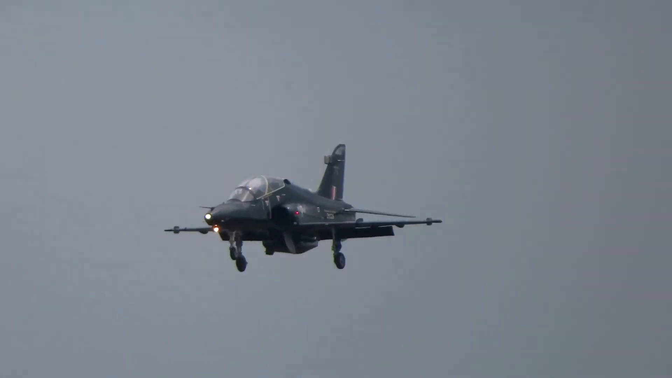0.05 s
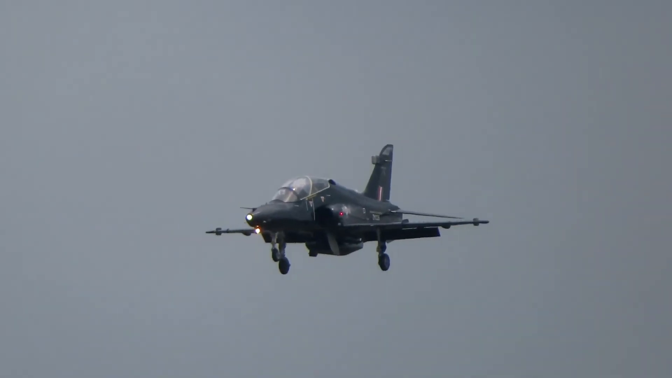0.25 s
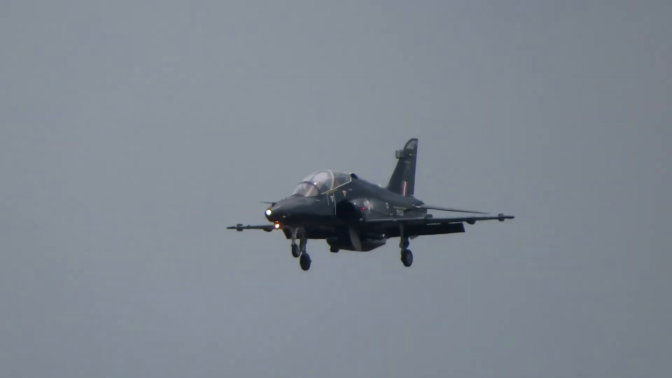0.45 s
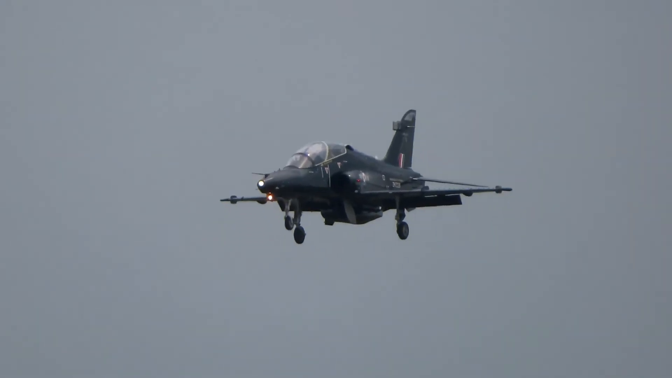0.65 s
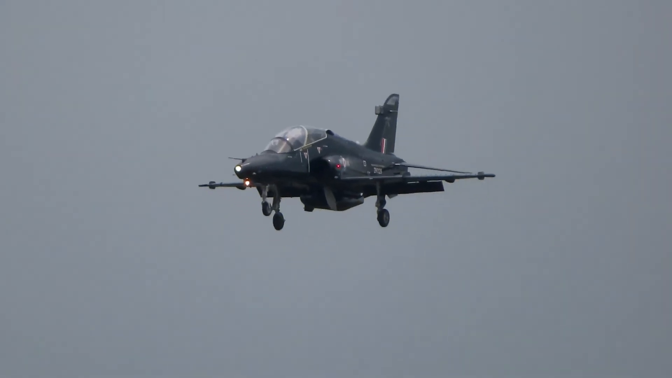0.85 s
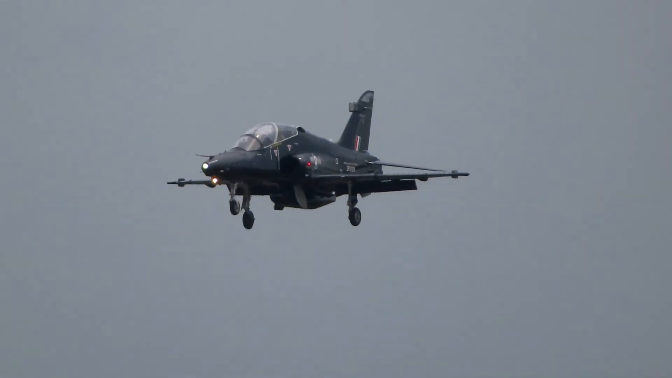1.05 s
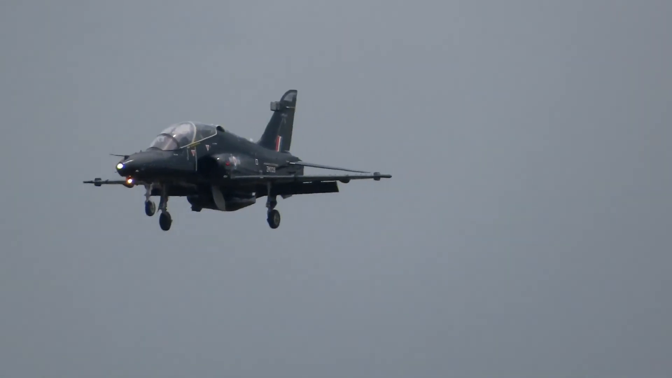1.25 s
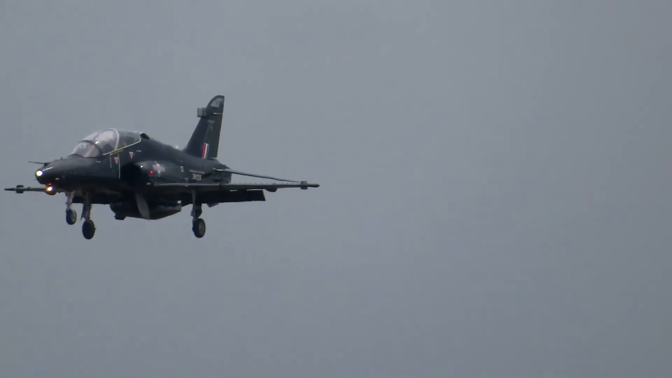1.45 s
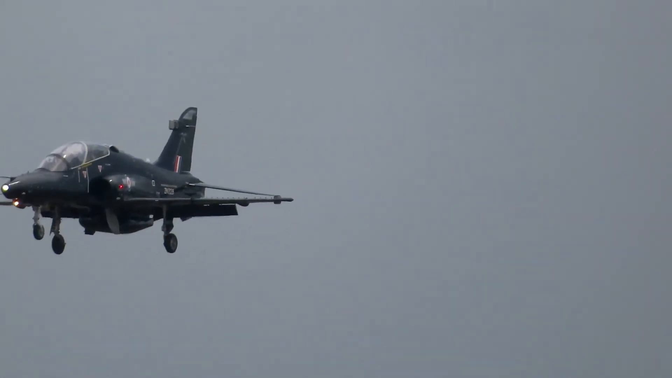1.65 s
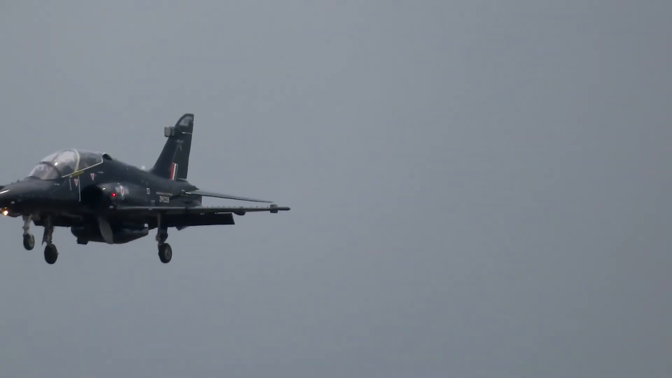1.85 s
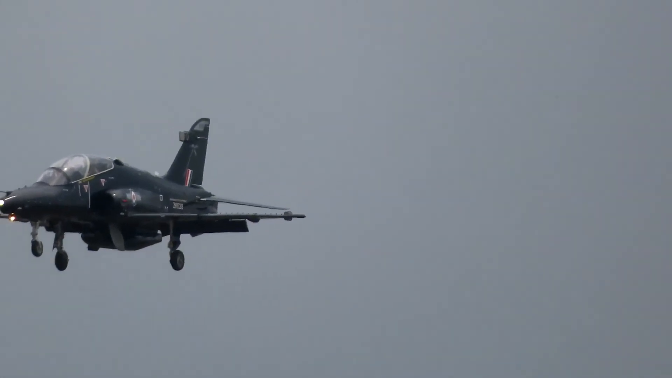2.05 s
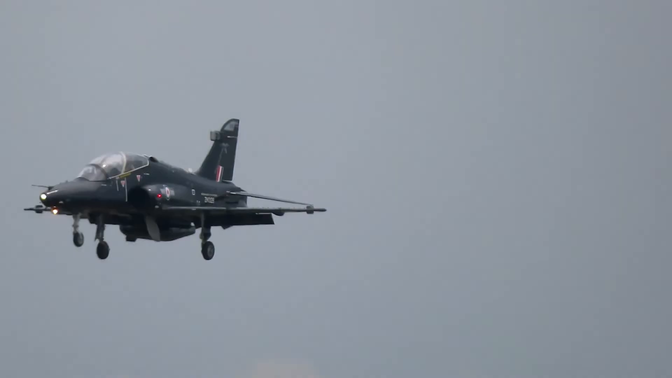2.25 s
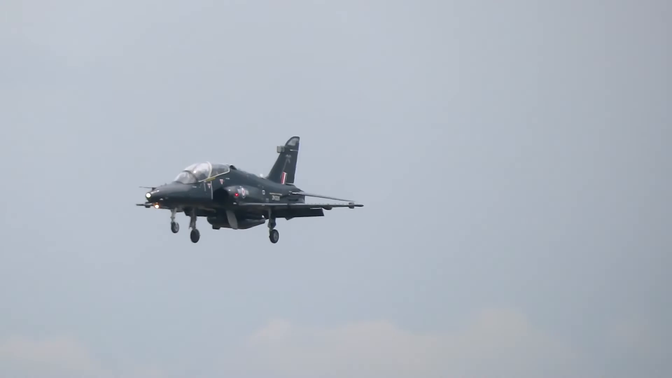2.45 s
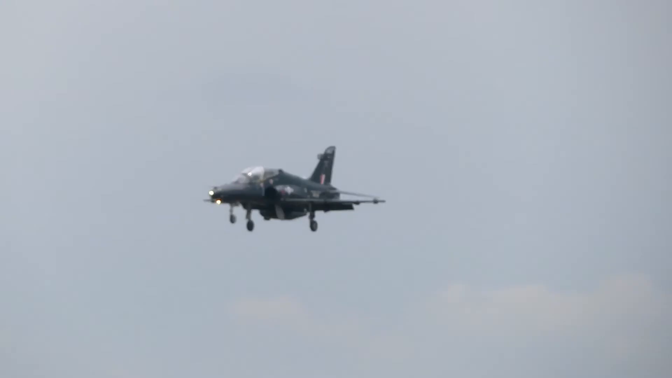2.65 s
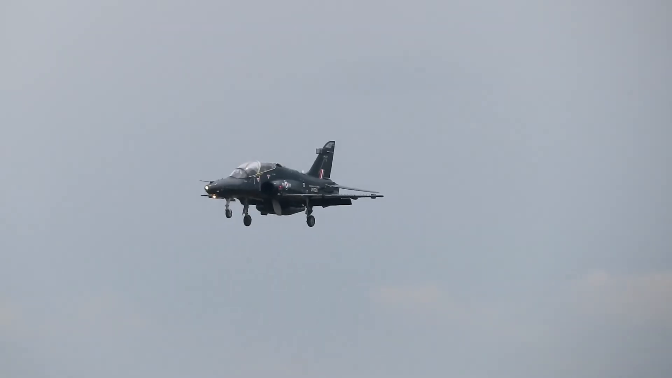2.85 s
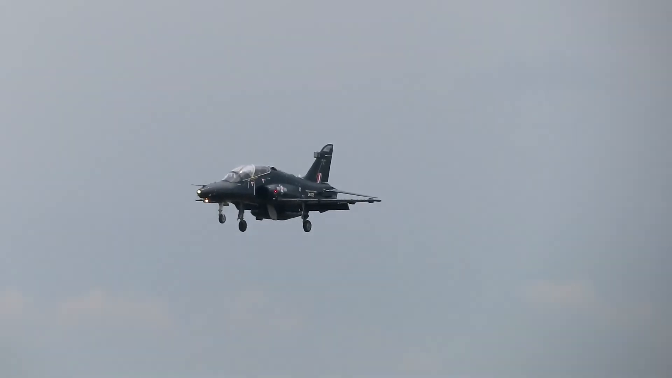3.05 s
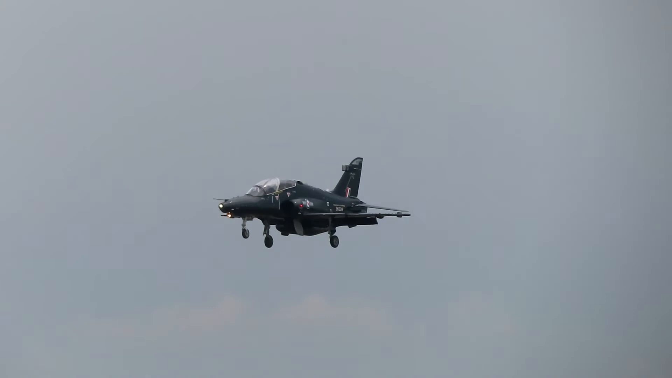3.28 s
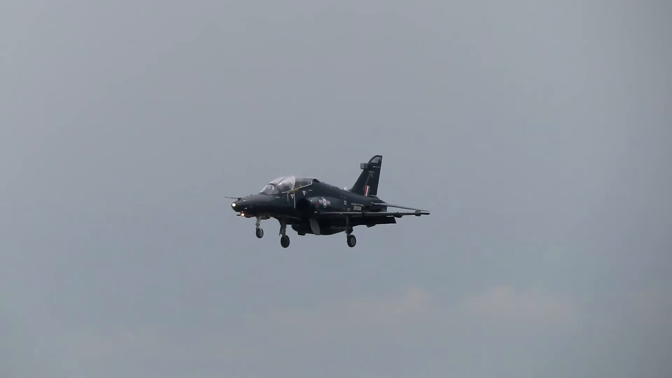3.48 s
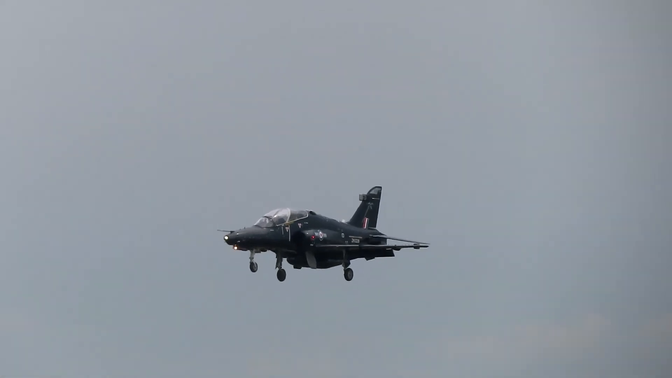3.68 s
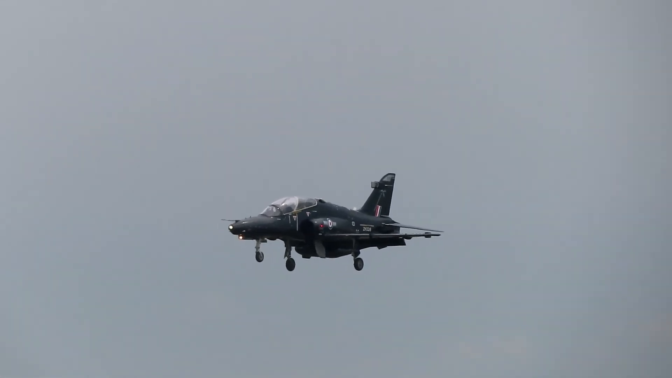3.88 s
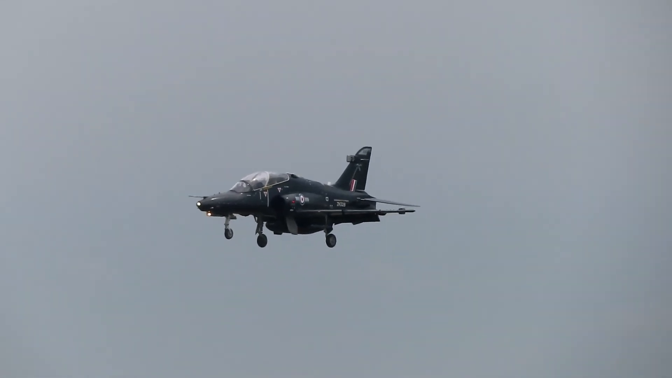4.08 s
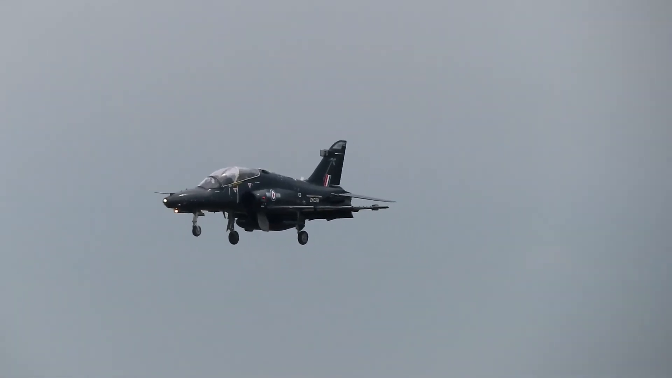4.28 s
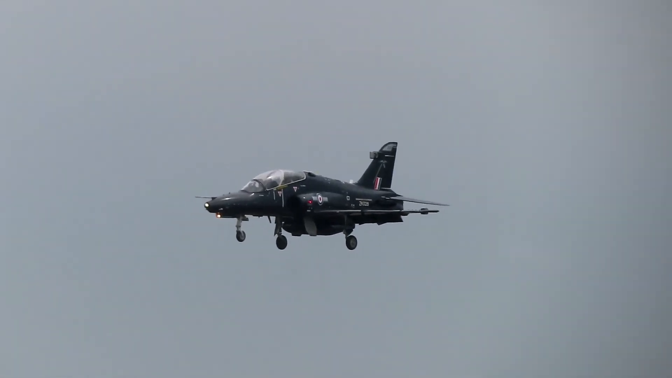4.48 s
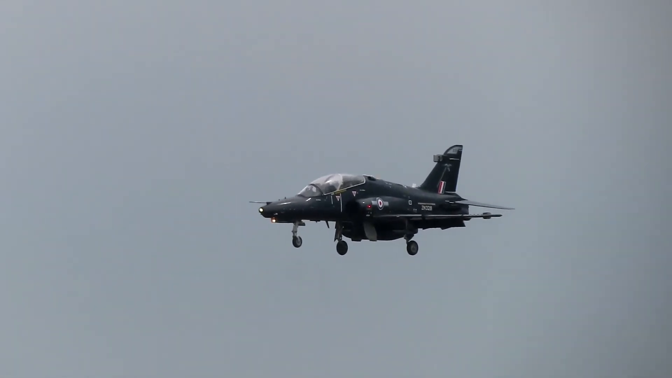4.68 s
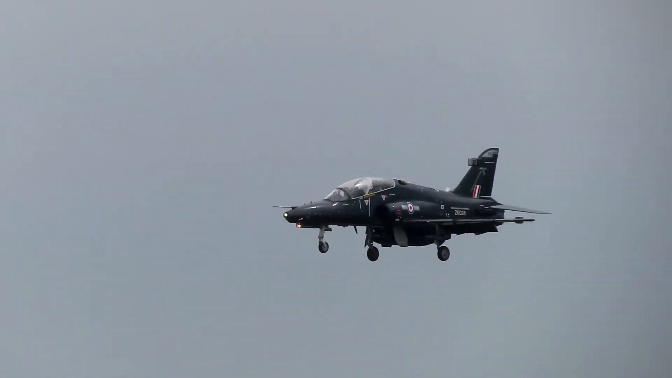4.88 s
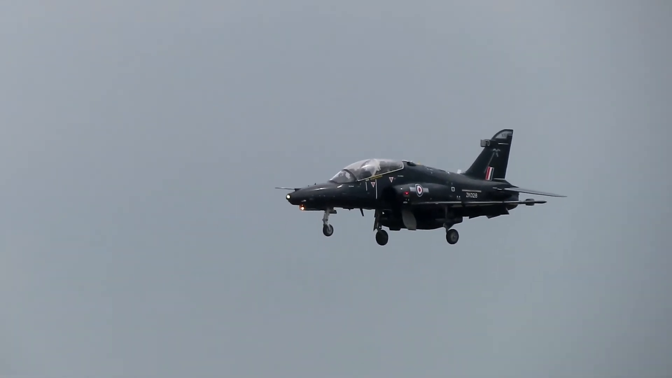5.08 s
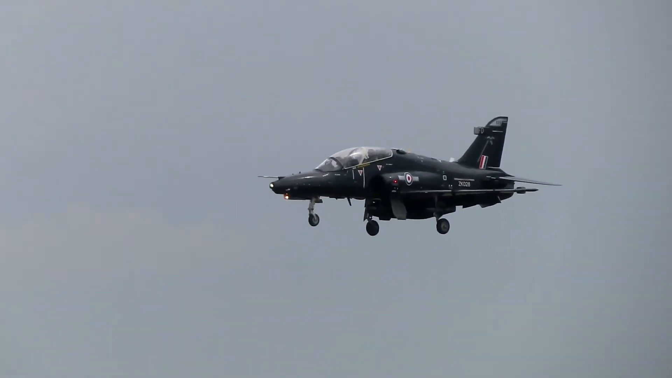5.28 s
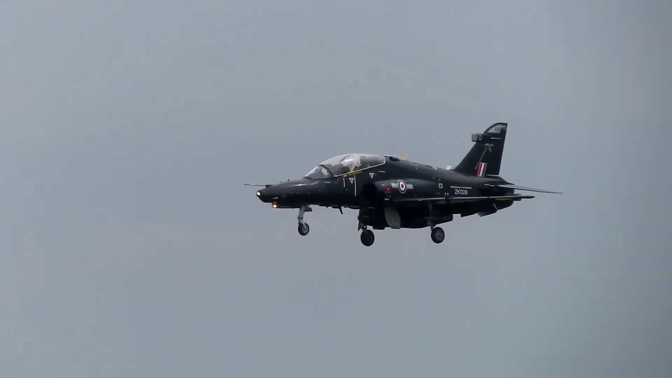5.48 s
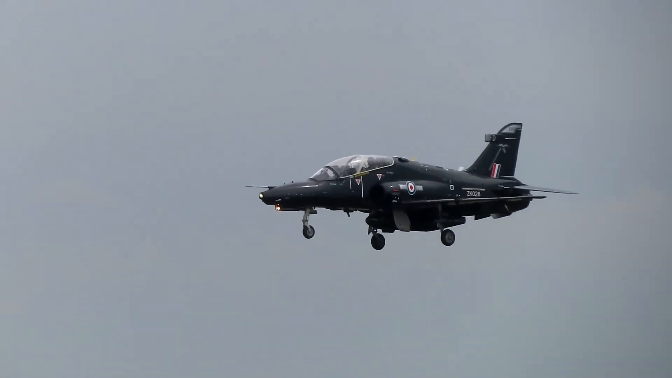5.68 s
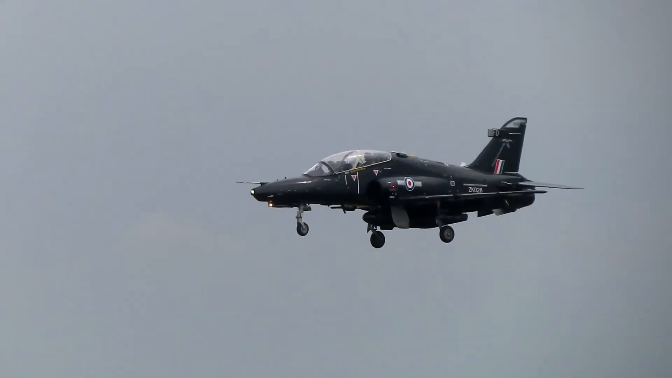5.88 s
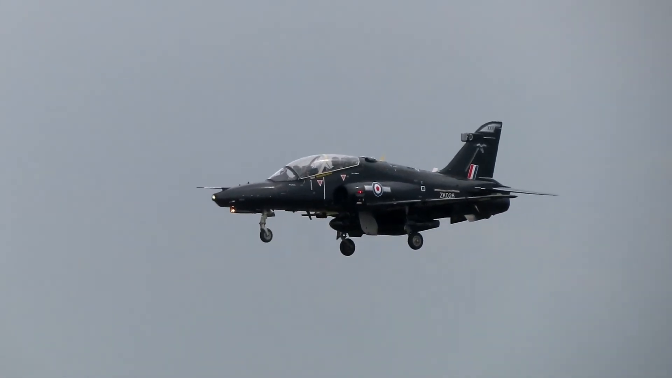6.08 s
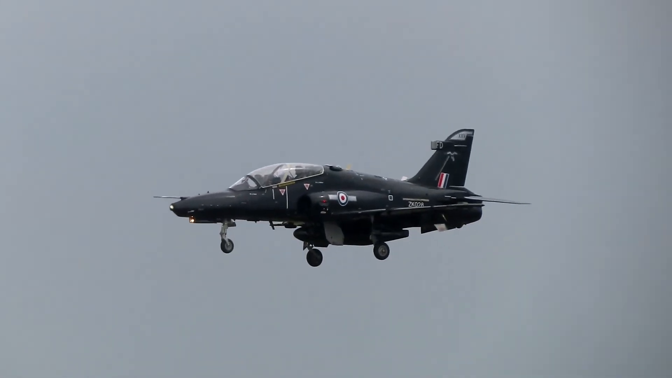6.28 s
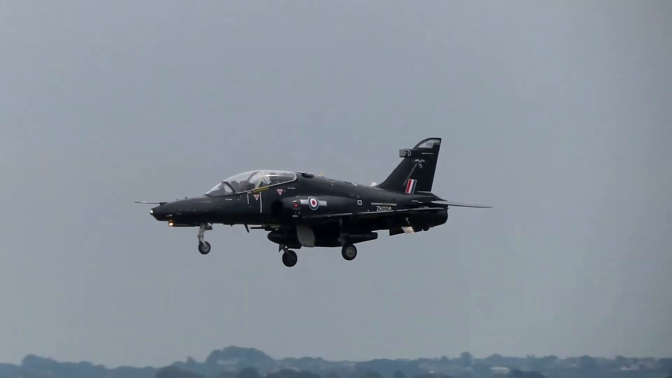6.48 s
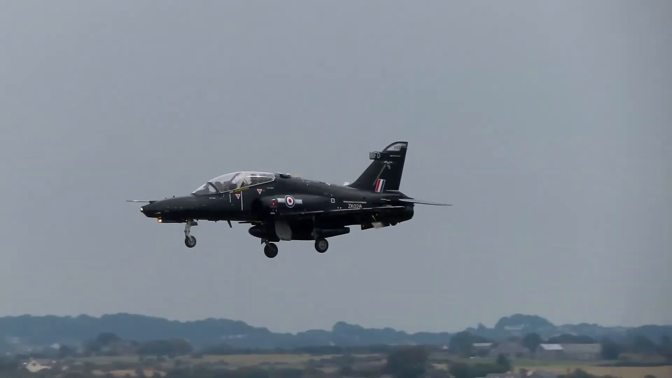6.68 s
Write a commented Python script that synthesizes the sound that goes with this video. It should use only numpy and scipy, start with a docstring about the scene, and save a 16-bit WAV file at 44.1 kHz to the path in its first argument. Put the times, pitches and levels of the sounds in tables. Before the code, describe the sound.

Outdoors, broad airy jet noise wavers as air bends the sound, coloured by close echoes. It stays subdued at first, then from midway grows fuller and brighter, the whine becoming clear and strong near the end before easing slightly. Close to the hand-held microphone are soft low wind gusts, tiny shutter clicks, a handling knock and faint hiss. The jet sits nearly central.

```python
"""A small jet on final approach comes towards a hand-held camera beside an airfield.
Its exhaust roar, airframe rush and intake hiss are bands of noise that swell through gusty air, with small crackles.
Close echoes and a hollow ring colour this noise; a wandering compressor whine and brief narrow flecks join it.
Faint extras: wind on the microphone, a dull bump, nearby stills cameras, the zoom drive, hiss and a thin sizzle."""
import sys
import numpy as np
from scipy import signal
from scipy.fft import rfft, irfft, next_fast_len
from scipy.io import wavfile
from scipy.ndimage import uniform_filter1d

SR = 44100
rng = np.random.default_rng(int(sys.argv[2]) if len(sys.argv) > 2 else 0)


def generate_wav(sig):
    """Save sig (samples, or channels by samples) to the path in sys.argv[1] as 16-bit PCM at SR."""
    pcm = np.round(np.clip(np.atleast_2d(sig).T, -1, 1) * 32767).astype(np.int16)
    wavfile.write(sys.argv[1], SR, pcm)


def magnitude_from_level(level_db):
    """Linear magnitude for a level in decibels (20 dB per decade)."""
    exponent = np.asarray(level_db, float) / 20
    return 10 ** exponent


N = 296793
T = np.arange(N) / SR  # time of each sample, s
F = np.fft.rfftfreq(next_fast_len(N), 1 / SR)  # filter frequencies, Hz

# How each part of the jet's spectrum follows the seven level curves: f/Hz, then its share (a plain factor)
# of roar, rush, upper rush, mid hiss, intake hiss, high hiss and treble, then a constant added level/dB
LAYERS = [(235, 0.94, 0, 0, 0, 0, 0, 0, 0.58), (980, 0.08, 1, 0.016, 0.026, 0.035, 0.025, 0.026, -1.35),
          (1520, 0, 0.0034, 0.98, 0, 0.0066, 0.0007, 0.0011, 2.5),
          (2270, 0.0056, 0, 0.0037, 0.96, 0.0053, 0.0069, 0.011, 3),
          (3105, 0, 0, 0.0022, 0, 0.99, 0, 0, -1.3),
          (4175, 0.016, 0.015, 0.035, 0.0017, 0.022, 0.96, 0.028, -1.3),
          (6040, 0.014, 0.0049, 0.046, 0.039, 0.058, 0.042, 0.88, 4),
          (9500, 0, 0, 0.0087, 0.053, 0.022, 0.019, 1.09, 8.5)]


def columns(table):
    """Draw straight lines through each column of a table, giving one value a sample."""
    seconds, *rest = np.transpose(table)
    return [np.interp(T, seconds, column) for column in rest]


def colour_db(points, hz):
    """Read a spectrum in dB on a log-frequency axis."""
    point_hz, db = np.transpose(points)
    return np.interp(np.log(np.maximum(hz, 1)), np.log(point_hz), db)


def shaped(x, gain):
    """Filter a sound by a gain for each frequency."""
    return irfft(rfft(x, 2 * len(F) - 2) * gain)[..., :N]


def unit(x):
    """Scale to an rms of 1."""
    return x / np.sqrt(np.mean(x ** 2))


def bell(hz, width_hz):
    """Gain of a simple resonance: full at its centre, falling away on both sides."""
    return 1 / (1 + 1j * (F - hz) / (width_hz / 2))


def walk(rate):
    """A smooth random wander: rate new values a second, averaged twice, with an rms of 1."""
    hold = int(SR / rate)  # samples
    steps = np.repeat(rng.standard_normal(N // hold + 1), hold)
    smooth = uniform_filter1d(uniform_filter1d(steps, hold), hold)
    return unit(smooth[:N])


def late(x, ms):
    """Delay a sound by a fixed or moving time."""
    return np.interp(T - ms / 1000, T, x)


def bursts(times, dbs, decay_ms):
    """Short noise bursts that start sharply and die away."""
    starts = np.zeros(N)
    np.add.at(starts, (np.asarray(times) * SR).astype(int), magnitude_from_level(dbs))
    envelope = signal.lfilter([1], [1, -np.exp(-1000 / SR / decay_ms)], starts)
    return rng.standard_normal(N) * envelope


def layer_levels():
    """Mix the jet's level curves into one level in dB for each part of its spectrum."""
    # Exhaust and airframe, swelling as the jet nears and the air bends the path: t/s, roar/dB, rush/dB
    roar_and_rush = [(0.0, -31, -25.5), (0.17, -37, -23.5), (0.6, -39.5, -33), (1.33, -33.5, -28),
                     (1.76, -32.5, -24), (2.59, -33.5, -29.5), (2.81, -33, -35.5), (3.15, -35.5, -29.5),
                     (3.22, -33.5, -35), (4.23, -25.5, -31), (4.29, -31.5, -32.5), (4.76, -25, -28),
                     (4.82, -27, -26.5), (5.06, -21, -19), (5.17, -29.5, -16.5), (5.55, -19.5, -24),
                     (6.33, -21.5, -15), (6.41, -17, -19), (6.52, -25, -22), (6.56, -21, -17),
                     (6.64, -20.5, -25.5), (6.73, -29, -24)]
    # Upper part of the rush: t/s, level/dB
    high_rush = [(0.0, -36), (0.02, -32), (0.62, -40.5), (0.67, -33.5), (1.22, -37.5), (1.31, -51),
                 (1.48, -30.5), (2.12, -29), (2.17, -33), (2.47, -30), (2.62, -38), (3.5, -38), (3.65, -34),
                 (3.92, -36.5), (4.23, -28.5), (4.48, -39.5), (5.04, -31.5), (5.75, -31), (5.88, -22.5),
                 (6.37, -24.5), (6.69, -32.5), (6.73, -31)]
    # Hiss just above the rush: t/s, level/dB
    mid_hiss = [(0.0, -35.5), (0.24, -45.5), (0.26, -36.5), (0.86, -45), (1.16, -38), (1.39, -44.5),
                (1.57, -42.5), (1.69, -41.5), (1.76, -35.5), (2.04, -34), (2.57, -41.5), (3.28, -43.5),
                (4.2, -37.5), (4.44, -44.5), (4.89, -30), (5.21, -34.5), (5.44, -29), (5.81, -32),
                (6.09, -23.5), (6.41, -24), (6.62, -36), (6.73, -35)]
    # Hiss of the engine intake: t/s, level/dB
    intake_hiss = [(0.0, -46), (0.15, -38.5), (0.28, -51), (0.41, -32.5), (0.6, -46), (1.74, -44.5),
                   (1.87, -35), (2.7, -47.5), (2.89, -40.5), (3.24, -48), (3.73, -37.5), (3.77, -45.5),
                   (4.27, -37.5), (4.33, -44), (4.83, -39.5), (4.89, -34), (5.27, -33.5), (5.32, -27.5),
                   (5.55, -34), (5.72, -25), (5.88, -31.5), (6.3, -23.5), (6.65, -34.5), (6.73, -41)]
    # Hiss just under the whine: t/s, level/dB
    high_hiss = [(0.0, -51), (0.26, -49), (0.3, -37), (0.36, -48.5), (1.01, -52.5), (1.1, -46), (1.31, -53),
                 (1.76, -53.5), (1.89, -39), (2.0, -39.5), (2.1, -47), (2.27, -48), (2.31, -49), (2.4, -51),
                 (2.55, -53), (2.75, -52), (2.81, -44), (3.09, -48.5), (3.8, -47), (3.89, -46), (3.97, -49),
                 (4.09, -43), (4.2, -50), (4.33, -47), (4.65, -48.5), (4.7, -35), (4.74, -47), (4.83, -43),
                 (4.865, -34), (4.9, -41), (4.99, -35), (5.28, -47), (5.32, -35), (6.07, -34),
                 (6.26, -28.5), (6.71, -41.5), (6.73, -43)]
    # Treble that survives the distance: t/s, level/dB
    treble = [(0, -68), (1.6, -65), (1.85, -63), (2.5, -69.5), (3.3, -62.5), (3.9, -57.5), (4.45, -56.5),
              (4.95, -47), (5.6, -45), (5.74, -45), (5.8, -44.5), (5.88, -44.5), (6.02, -43.5),
              (6.15, -45.5), (6.23, -34.5), (6.255, -38), (6.278, -35), (6.304, -44), (6.33, -38),
              (6.42, -45), (6.44, -48), (6.58, -47), (6.65, -52), (6.73, -56)]
    curves = columns(roar_and_rush)
    for table in (high_rush, mid_hiss, intake_hiss, high_hiss, treble):
        curves += columns(table)
    rows = np.array(LAYERS)
    return rows[:, 1:-1] @ np.array(curves) + rows[:, -1:]


def jet_noise():
    """Sixth-octave bands of turbulence, mid and side; eddies in the air make the treble flicker most."""
    # Engine noise before the echoes: f/Hz, relative level per Hz/dB
    jet_colour = [(40, -25), (120, 12.5), (300, 20), (900, 16.5), (1600, 11.5), (2400, 11.5), (3200, 13.5),
                  (4400, 15.5), (5050, 17), (5500, 11), (6200, 6), (7000, 0.5), (8000, -6.5),
                  (10300, -18.5), (12000, -49)]
    # Scattered part of the sound: f/Hz, side against mid/dB
    spread = [(100, -71), (500, -28.5), (1200, -26.5), (2500, -19), (5000, -16.5), (9000, -7.5),
              (12000, -3)]
    levels, out = layer_levels(), 0
    layer_hz = np.array(LAYERS)[:, 0]
    gust = .5 * walk(rate=30) + .9 * walk(rate=60)  # shared by all bands
    for hz in 40 * 2 ** (np.arange(51) / 6):
        distance = np.clip(6 * np.log2(np.maximum(F, 1) / hz), -1, 1)  # in sixths of an octave
        mask = np.cos(distance * np.pi / 2)
        band = shaped(rng.standard_normal((2, N)), mask * magnitude_from_level(colour_db(jet_colour, F)))
        # Blend the levels of the two nearest layers
        weights = [np.interp(np.log(hz), np.log(layer_hz), row) for row in np.eye(len(LAYERS))]
        treble_flicker_db = min(hz / 4000, 1.1) * (1.1 * gust + 2.3 * walk(rate=40))
        flicker_db = treble_flicker_db + 1.1 * walk(rate=14)
        out = out + band * magnitude_from_level(weights @ levels + flicker_db) * [[1], [magnitude_from_level(colour_db(spread, hz))]]
    return out


def crackle():
    """Small exhaust shocks: randomly timed noise bursts that grow with the jet's highest layer."""
    chance = rng.random((400, 2))
    times = chance[:, 0] * (N - 1) / SR
    near_db = np.interp(times, T, layer_levels()[-1])
    chance_db = -3 * np.log(chance[:, 1] + 1e-3)  # a few shocks stand out
    shocks = bursts(times, 1.19 * near_db + 26 + chance_db, decay_ms=0.32)
    return shaped(shocks, bell(3800, 4000) ** 6) * [[1], [magnitude_from_level(-20)]]


def echoes(x):
    """Four delayed copies comb the sound: ground (lag tends to grow), later, dull inverted and long."""
    # Echo paths: t/s, then share (0-1) and delay/ms of the ground echo, the later echo,
    # the inverted echo from something close and the long echo; the last two are dulled
    echo_paths = [(0.1, 0.35, 0.79, 0.35, 1.43, 0.01, 2.3, 0.23, 2.06),
                  (0.5, 0.1, 0.93, 0.06, 1.24, 0.1, 1.5, 0.16, 2.19),
                  (0.85, 0.35, 0.84, 0.24, 1.14, 0.05, 1.6, 0.44, 2.06),
                  (1.2, 0.2, 0.91, 0.22, 1.32, 0.07, 1.83, 0.15, 2.12),
                  (1.55, 0.26, 0.92, 0.22, 1.13, 0.08, 1.6, 0.04, 2.16),
                  (1.9, 0.38, 0.89, 0.27, 1.21, 0.32, 1.6, 0.12, 2.15),
                  (2.25, 0.2, 0.87, 0.36, 1.23, 0.32, 1.62, 0.07, 2.12),
                  (2.6, 0.25, 0.93, 0.13, 1.21, 0.48, 1.62, 0.42, 2.18),
                  (2.95, 0.23, 0.95, 0.35, 1.27, 0.52, 1.74, 0.17, 2.07),
                  (3.3, 0.3, 0.92, 0.32, 1.19, 0.2, 1.63, 0, 2.35),
                  (3.65, 0.1, 0.93, 0.13, 1.26, 0.22, 1.59, 0.27, 2.08),
                  (4, 0.31, 0.91, 0.16, 1.06, 0.32, 1.55, 0.12, 1.8),
                  (4.3, 0.48, 1.03, 0.22, 1.2, 0.41, 1.6, 0.1, 1.84),
                  (4.65, 0.23, 1.02, 0.15, 1.28, 0.28, 1.73, 0, 2.12),
                  (5, 0.27, 1.04, 0.11, 1.31, 0.22, 1.55, 0.04, 2.7),
                  (5.4, 0.27, 1.02, 0.14, 1.24, 0.12, 1.8, 0.12, 2.24),
                  (5.8, 0.21, 1.13, 0.23, 1.36, 0.15, 1.44, 0.2, 2.5),
                  (6.15, 0.24, 1.06, 0.2, 1.246, 0.2, 1.69, 0.28, 2.3),
                  (6.55, 0.18, 1.02, 0.17, 1.32, 0.32, 1.63, 0.03, 1.9)]
    ground, ground_ms, later, later_ms, inverted, inverted_ms, far, far_ms = columns(echo_paths)
    dull_sound = shaped(x, 1 / np.sqrt(1 + (F / 1700) ** 4))  # low-pass, Hz
    ground_ms = ground_ms + 0.015 * walk(rate=6)
    out = []
    for direct, dull in zip(x, dull_sound):
        bright_echoes = ground * late(direct, ground_ms) + later * late(direct, later_ms)
        dull_echoes = far * late(dull, far_ms) - inverted * late(dull, inverted_ms)
        out.append(direct + bright_echoes + dull_echoes)
    return np.array(out)


def hollow(x):
    """A moving resonance adds a hollow ring to a narrow part of the rush."""
    # Hollow ring: t/s, centre f/Hz, level against the rush/dB
    hollow_ring = [(0, 940, 1.5), (.7, 910, -10), (1.4, 880, -2.5), (1.9, 910, -3), (2.4, 930, 5),
                   (3, 880, 1), (3.6, 920, 7), (4.3, 920, -2.5), (4.95, 840, -7), (5.15, 1070, -3),
                   (5.3, 950, -9), (5.5, 840, -5.5), (6.2, 790, -5), (6.73, 800, -6)]
    width_hz = 155
    hz, db = columns(hollow_ring)
    # Shift the moving centre down to zero, low-pass, then shift back
    turn = np.exp(2j * np.pi * np.cumsum(hz) / SR)
    pole = np.exp(-np.pi * width_hz / SR)
    ring = np.real(turn * signal.lfilter([1 - pole], [1, -pole], x / turn))
    return x + 2 * magnitude_from_level(db) * ring


def whine():
    """Compressor blade tone over a steady path and scattered ones that beat; its octave is a blurred band."""
    # Blade tone as the pilot works the throttle: t/s, f/Hz
    whine_pitch = [(0, 4590), (.3, 4570), (.7, 4480), (.9, 4470), (1.1, 4680), (1.3, 4950), (1.5, 5065),
                   (1.85, 5095), (2.3, 5290), (2.6, 5285), (2.85, 5090), (3.3, 5050), (3.7, 4975),
                   (4.2, 4990), (4.5, 5090), (4.75, 5345), (5.05, 5365), (5.35, 5080), (5.6, 5005),
                   (6.0, 4970), (6.73, 4900)]
    # Blade tone: t/s, level/dB
    whine_level = [(0, -58), (.09, -51), (.2, -60), (.3, -50), (.36, -60), (.4, -52), (.5, -60), (.6, -53),
                   (.65, -61), (.69, -49), (.74, -59), (.79, -51), (.83, -59), (.87, -50), (.95, -60),
                   (1.1, -61), (1.5, -56), (1.58, -66), (1.8, -60), (1.98, -53), (2.03, -61), (2.08, -51),
                   (2.13, -58), (2.275, -58), (2.295, -44), (2.32, -46), (2.34, -55), (2.37, -66),
                   (2.42, -55), (2.44, -60), (2.47, -51), (2.51, -54), (2.535, -68), (2.575, -51),
                   (2.6, -62), (2.62, -53), (2.635, -62), (2.655, -48), (2.675, -63), (2.7, -55),
                   (2.75, -58), (2.9, -61), (3.3, -63), (3.38, -58), (3.5, -63), (3.72, -57), (3.78, -51),
                   (3.86, -58), (4.07, -52), (4.23, -53), (4.35, -60), (4.45, -60), (4.55, -48),
                   (4.62, -55), (4.68, -46), (4.86, -49), (4.96, -38), (5.0, -45), (5.05, -40), (5.25, -45),
                   (5.36, -48), (5.44, -40), (5.5, -49), (5.6, -41), (5.67, -47), (5.76, -42), (5.84, -45),
                   (5.9, -44), (5.97, -36), (6.01, -44), (6.035, -35), (6.1, -41), (6.17, -32), (6.24, -34),
                   (6.26, -28), (6.29, -28), (6.31, -36), (6.33, -29), (6.36, -39), (6.41, -33),
                   (6.45, -38), (6.52, -43), (6.56, -36), (6.63, -41), (6.68, -34), (6.73, -39)]
    hz, db = columns(whine_pitch)[0], columns(whine_level)[0]
    phase = 2 * np.pi * np.cumsum(hz + 11 * walk(rate=80)) / SR
    # Eddies split the tone: a steady part plus slower and faster fading parts
    slow_fades = walk(rate=70) + 1j * walk(rate=70)
    fast_fades = walk(rate=300) + 1j * walk(rate=300)
    paths = 1.6 + .7 * slow_fades + .55 * fast_fades
    octave = magnitude_from_level(-31) * walk(rate=700) * np.sin(2 * phase)
    tone = magnitude_from_level(db) * unit(np.imag(paths * np.exp(1j * phase)) + octave)
    return np.array([tone, magnitude_from_level(-22) * late(tone, .05)])


def flecks():
    """Brief narrow-band flecks in the jet noise: sliding carriers whose strength and phase waver at random."""
    # Flecks, all sliding down: start t/s, length/s, from f/Hz, to f/Hz, level/dB, wavers per second
    fleck_rows = [(0.266, 0.087, 4500, 4350, -41, 350), (2.793, .08, 5000, 4430, -48, 220),
                  (3.547, 0.076, 387, 350, -26, 27), (3.642, 0.068, 492, 476, -35, 25),
                  (4.037, 0.063, 517, 477, -29.5, 20), (4.044, .07, 335, 334, -28, 25)]
    out = 0
    for start, length, from_hz, to_hz, db, rate in fleck_rows:
        along = np.clip((T - start) / length, 0, 1)
        phase = 2 * np.pi * np.cumsum(from_hz + (to_hz - from_hz) * along) / SR
        rough = (1 + .5 * walk(rate)) * np.sin(phase) + .5 * walk(rate) * np.cos(phase)
        out = out + magnitude_from_level(db) * np.sin(np.pi * along) * rough
    return out * np.array([[1], [magnitude_from_level(-25)]])


def wind():
    """Low buffeting in gusts; the part unlike at the two ports lies a little higher."""
    # Wind on the microphone: t/s, level/dB, unlike part against that level/dB
    wind_levels = [(0, -32.5, -3), (.14, -60, -31), (.7, -64, -26), (1.05, -35, -45), (1.5, -43.5, -38),
                   (2.2, -34, -43), (2.52, -32.5, -24), (2.7, -42, -42), (3.5, -47, -48), (4.1, -47, -26),
                   (4.7, -31.5, -15), (5.2, -38.5, -15), (5.55, -34, -13), (5.9, -36.5, -14),
                   (6.25, -22.5, -6), (6.45, -29, -2.5), (6.73, -41, -18)]
    db, unlike_db = columns(wind_levels)
    mid_gain = (F / (F + 40)) ** 2 / (1 + (F / 100) ** 3)
    side_gain = (F / (F + 90)) ** 3 / (1 + (F / 130) ** 4)
    mid, side = (unit(shaped(rng.standard_normal(N), gain)) * magnitude_from_level(2.0 * walk(rate=10))
                 for gain in (mid_gain, side_gain))
    gusts = unit(magnitude_from_level(2.0 * walk(rate=12)))
    return magnitude_from_level(db) * gusts * np.array([mid, magnitude_from_level(unlike_db) * side])


def thump():
    """A dull bump on the camera body: a short low ring of noise, alike at both ports."""
    bump = bursts([0.001], [2.5], decay_ms=37)  # at s, dB before the filter
    return shaped(bump, bell(138, 140) ** 2) * [[1], [0]]


def shutters():
    """Stills cameras nearby: each shot is the same run of mirror and curtain clicks, ringing in the body."""
    # Stills fired: t/s, level before the ring/dB
    shots = [(0.4633, -51), (1.3803, -47), (1.6826, -51), (3.1837, -49), (3.5603, -46), (3.9225, -49),
             (4.2762, -48), (4.7147, -49)]
    # Clicks of one shutter cycle: time from the shot/ms, level against the shot/dB
    cycle = [(-124, -7), (-115, -9), (-104, -7.5), (-55.5, -3.5), (-9, -2.5), (-11.5, -0.5), (10, 4.5)]
    # Ringing of the clicks: f/Hz, width/Hz, level/dB
    modes = [(7130, 4100, 6), (9300, 1800, -11), (13100, 2200, -9.5)]
    rows = np.array([(s + ms / 1000, db + step_db) for s, db in shots for ms, step_db in cycle])
    clicks = bursts(*rows.T, decay_ms=0.7)
    ring = shaped(clicks, sum(magnitude_from_level(db) * bell(hz, width) for hz, width, db in modes))
    return np.array([ring, magnitude_from_level(3.5) * late(ring, .1)])


def zoom():
    """Knocks on the zoom lever and the hum of the lens drive, a wavering tone with its octave."""
    # Finger on the zoom lever: t/s, level before the filter/dB
    lever_knocks = [(2.24, -22), (2.265, -13.5), (2.677, -33.5)]
    body = bell(700, 1500) ** 2 + magnitude_from_level(-22.5) * bell(3200, 3500) ** 2
    knocks = shaped(bursts(*np.transpose(lever_knocks), decay_ms=8.4), body)
    drive_s, drive_db = (2.36, 2.4, 3), (-55, -42, -63)  # start, loudest, stop; before the port gains
    phase = 2 * np.pi * np.cumsum(440 + 12 * walk(rate=25)) / SR  # Hz
    running = (T > drive_s[0]) & (T < drive_s[-1])
    hum = np.sin(phase) + magnitude_from_level(-10.5) * np.sin(2 * phase)
    return knocks + running * magnitude_from_level(np.interp(T, drive_s, drive_db)) * hum


def hiss():
    """Steady microphone hiss, and now and then a thin grainy sizzle at the very top."""
    # Colour of the hiss: f/Hz, relative level per Hz/dB
    hiss_colour = [(3000, -10), (7000, 0.5), (10000, -3.5), (13000, -5.5), (16000, -17.5)]
    # Thin high sizzle: middle t/s, length/s, level/dB
    sizzles = [(.7, .14, -74), (.9, .28, -71), (1.6, .2, -80), (4.1, .4, -79), (4.7, .3, -81)]
    steady = magnitude_from_level(-68.5) * unit(shaped(rng.standard_normal((2, N)), magnitude_from_level(colour_db(hiss_colour, F))))
    swell = sum(magnitude_from_level(db) * np.exp(-(2 * (T - s) / length) ** 4) for s, length, db in sizzles)
    grains = rng.standard_normal((2, N)) * magnitude_from_level(4 * walk(rate=90))
    return steady + swell * unit(shaped(grains, bell(14300, 2400) ** 2))


def scene():
    """Turn the mid and side layers into left and right, with the jet drifting to the right."""
    # Tone balance of the two ports for the jet: f/Hz, left against right/dB
    port_tilt = [(60, 1.6), (200, .3), (1000, -.1), (3000, -.7), (9000, 0)]
    pan_db = -0.075 * T  # left against right, dB
    mid, side = hollow(echoes(jet_noise() + crackle())) + whine() + flecks()
    jet = np.array([mid + side, mid - side]) * magnitude_from_level(np.array([pan_db, -pan_db]) / 2)
    lag_ms = np.array([[0.0083], [0]])  # the left port hears the jet later
    lag = np.exp(-2j * np.pi * F * lag_ms / 1000)
    jet = shaped(jet, lag * magnitude_from_level(colour_db(port_tilt, F) * [[.5], [-.5]]))
    mid, side = wind() + thump() + shutters() + hiss()
    nearby = np.array([mid + side, mid - side])
    # The camera body carries the zoom mostly to the right port
    return jet + nearby + zoom() * [[-.4], [1.6]]


def top_cut(x):
    """Nothing passes above the cut-off."""
    return signal.sosfilt(signal.butter(12, 15750, fs=SR, output="sos"), x)


def record(dry):
    """Store the finished mix as the camera does."""
    return top_cut(dry)


dry = scene()
out = record(dry)
generate_wav(out)
```